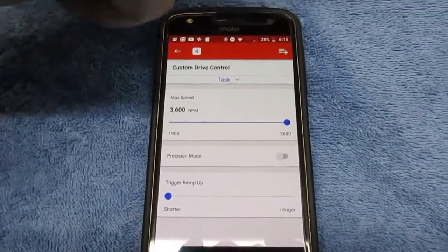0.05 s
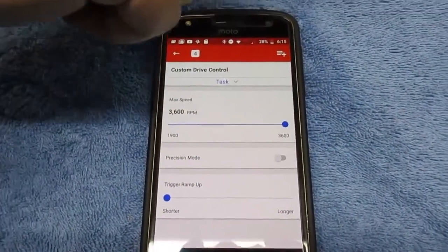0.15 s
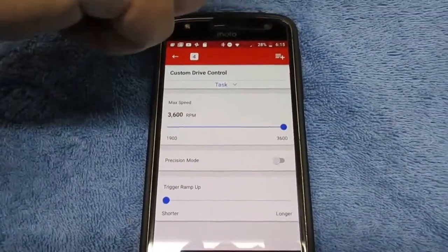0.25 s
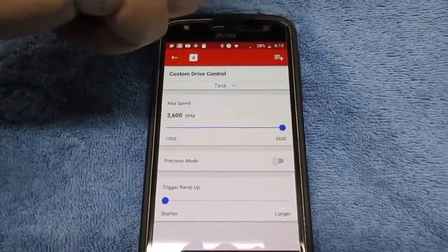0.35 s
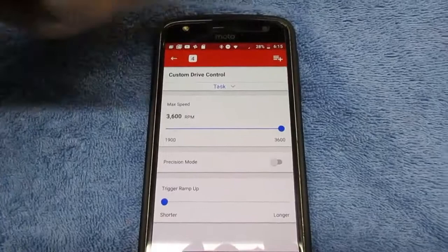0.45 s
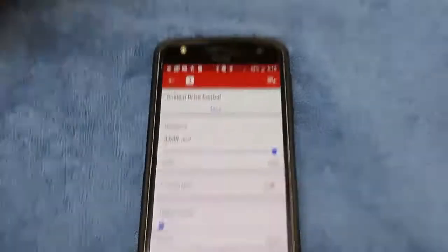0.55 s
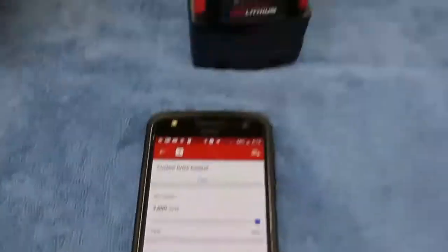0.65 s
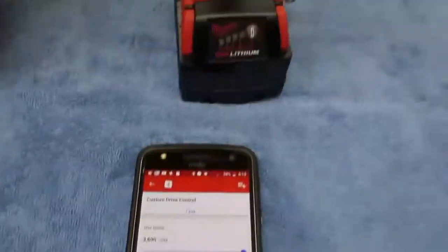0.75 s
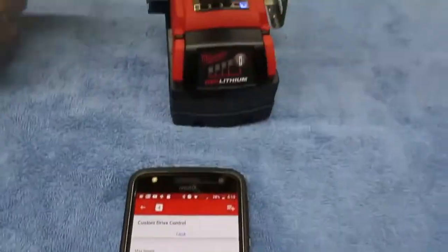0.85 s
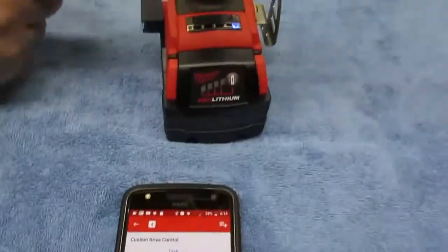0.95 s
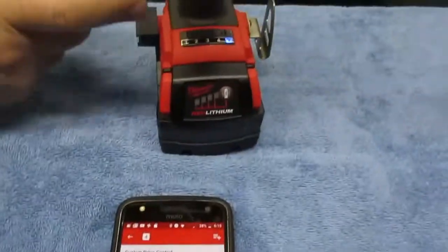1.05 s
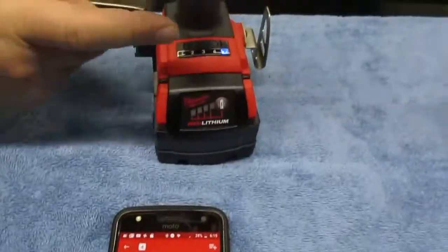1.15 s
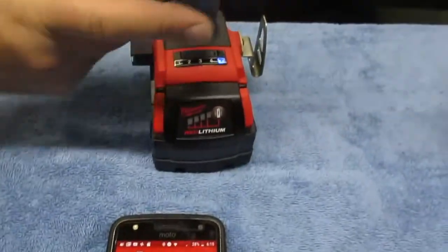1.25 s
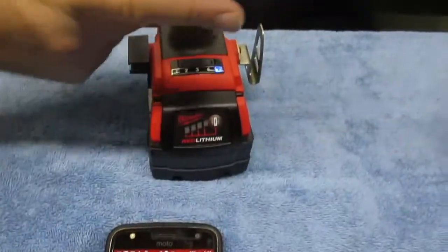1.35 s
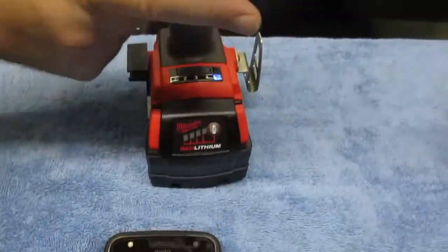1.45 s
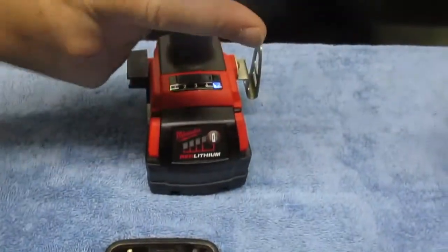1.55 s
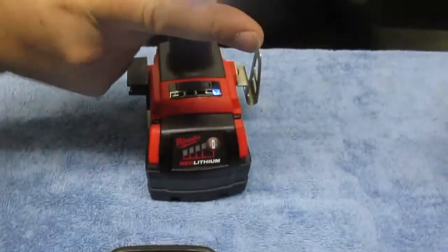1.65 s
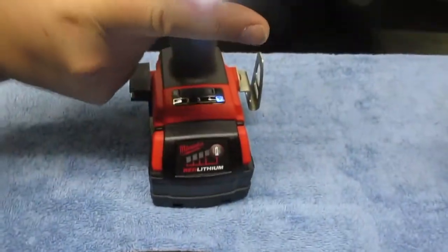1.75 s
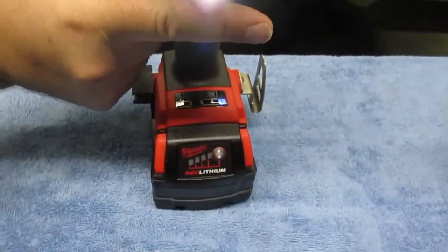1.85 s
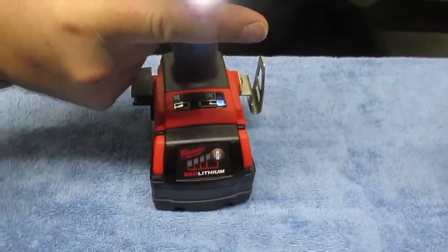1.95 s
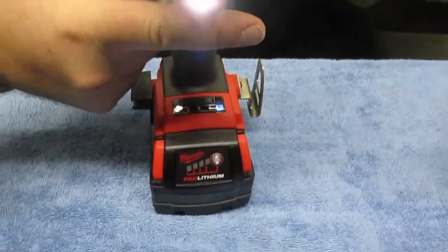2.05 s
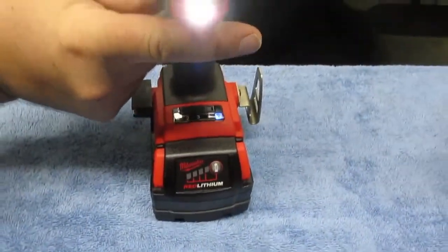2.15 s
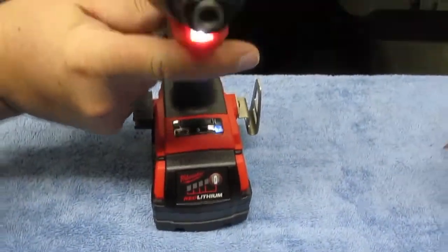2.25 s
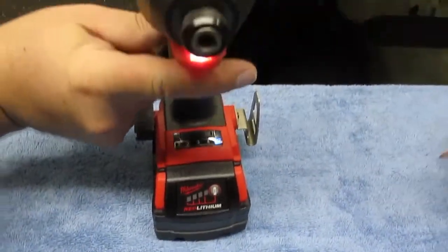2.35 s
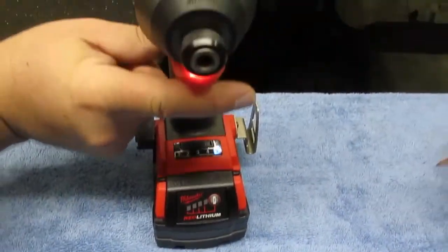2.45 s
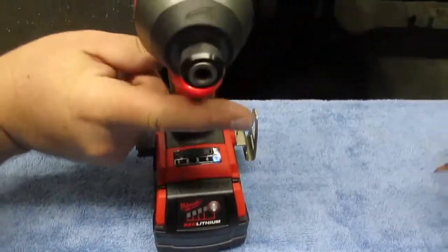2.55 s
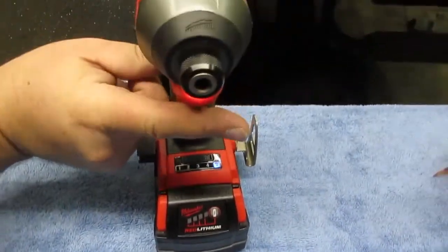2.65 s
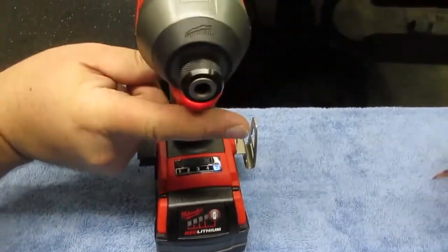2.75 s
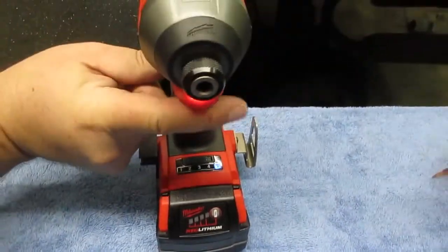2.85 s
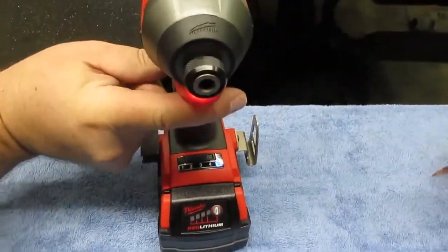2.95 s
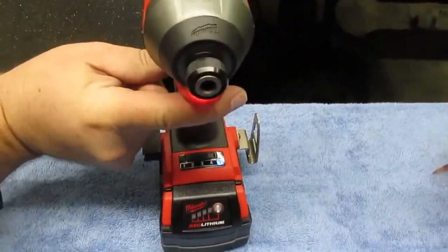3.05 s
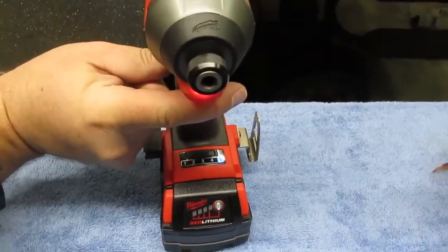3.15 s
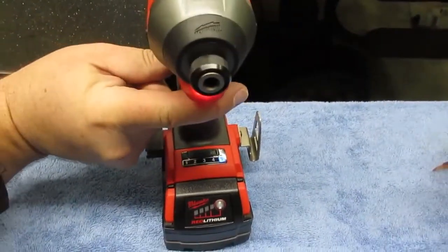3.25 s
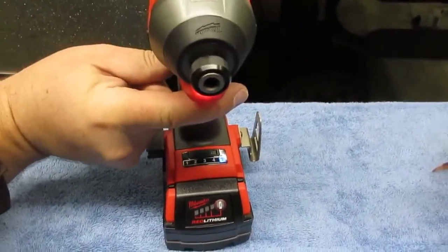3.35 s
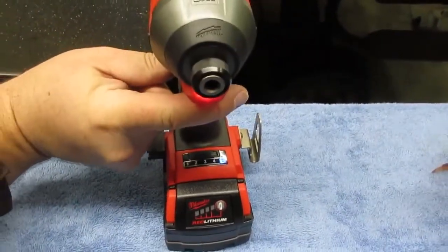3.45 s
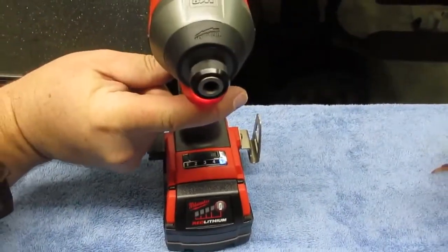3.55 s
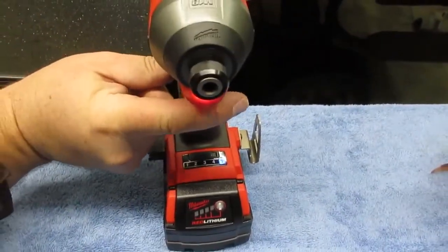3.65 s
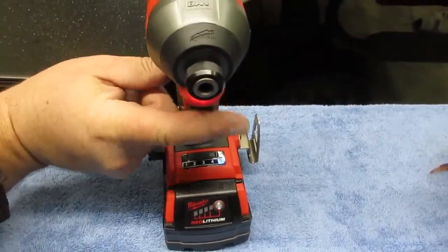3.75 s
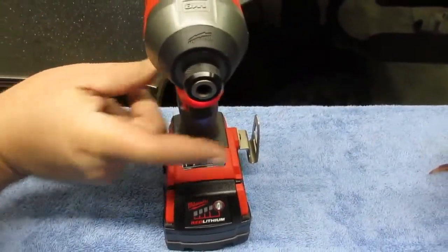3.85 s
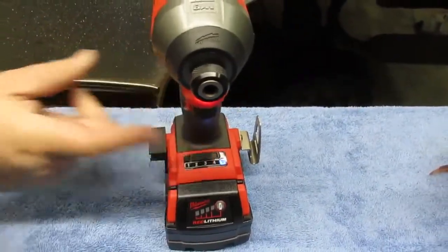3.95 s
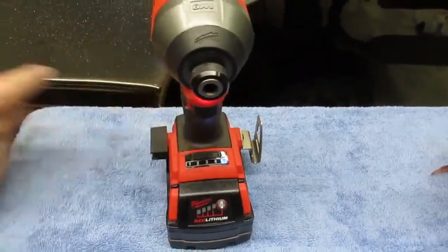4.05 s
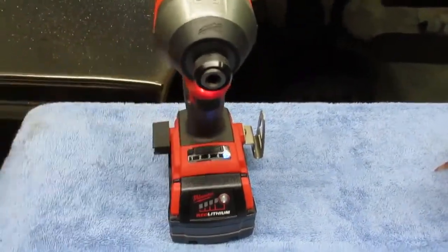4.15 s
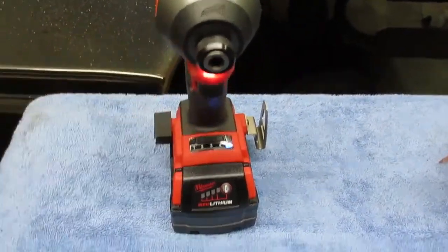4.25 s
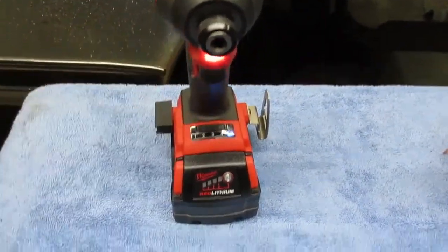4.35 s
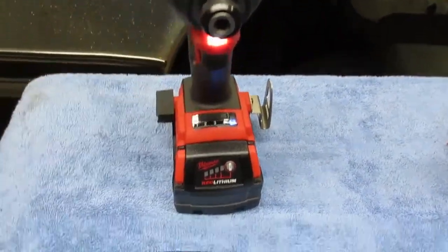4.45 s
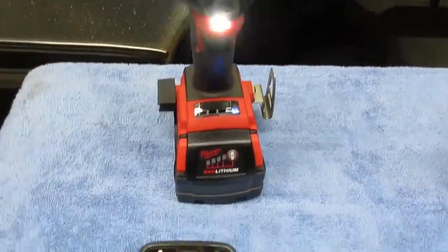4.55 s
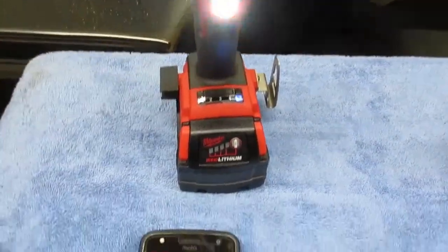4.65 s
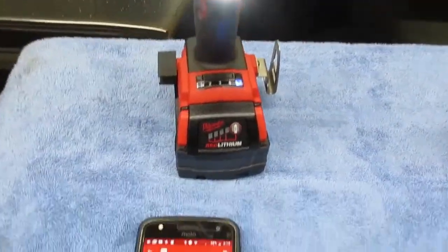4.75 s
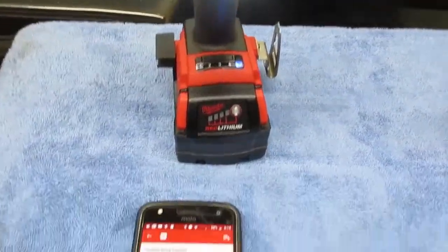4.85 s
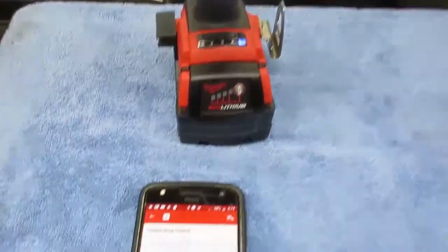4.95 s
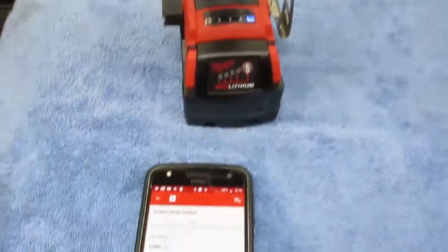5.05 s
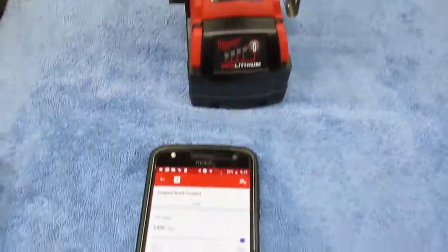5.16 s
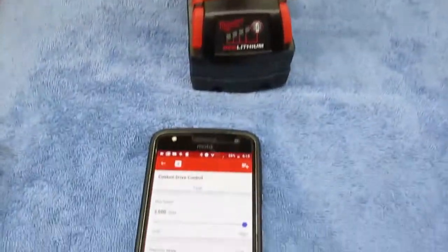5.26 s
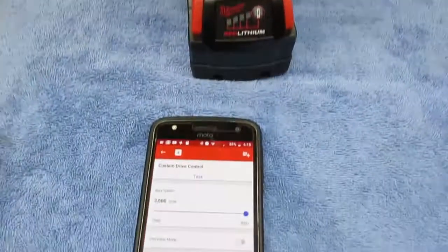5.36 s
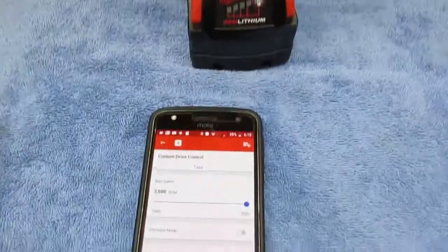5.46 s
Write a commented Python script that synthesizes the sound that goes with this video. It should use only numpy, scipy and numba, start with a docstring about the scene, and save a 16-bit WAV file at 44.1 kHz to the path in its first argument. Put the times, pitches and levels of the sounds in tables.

```python
"""Cordless impact driver on a workbench

An impact driver is run up twice with an empty chuck, close by. The trigger clicks, the motor races to its
governed speed, holds it and is braked. It whines at multiples of its speed; knocking gear teeth excite the
housing, and the gear case flares as the tooth rate sweeps through its ring. A fan hums in the room, and
the camera's gain control ducks everything when the level gets too high, then lets it creep back."""
import sys
import numpy as np
from scipy import signal
from scipy.fft import rfft, irfft, next_fast_len
from scipy.io import wavfile
from scipy.ndimage import uniform_filter1d
from numba import njit

SR = 44100
rng = np.random.default_rng(int(sys.argv[2]) if len(sys.argv) > 2 else 0)


def wrap_up_sound(samples):
    """Save the sound to the file named by the first command line argument, as 16-bit audio."""
    columns = np.atleast_2d(samples).T
    # keep every value between -1 and 1, then stretch to whole-number steps
    tamed = np.clip(columns, -1, 1)
    steps = np.round(tamed * 32767).astype(np.int16)
    wavfile.write(sys.argv[1], SR, steps)


N = 242574
T = np.arange(N) / SR
FFT_SIZE = next_fast_len(N, True)
FREQS = np.maximum(np.arange(FFT_SIZE // 2 + 1) * SR / FFT_SIZE, 1)

# pulls of the trigger, levels relative within the driver mix:
# [start_s, release_s, rattle_db, hiss_db, extra_rattle_under_torque_db, drift_of_both_db_per_s]
TRIGGER_PULLS = [(1.915, 2.604, -18.5, -21.5, 5, .6), (3.066, 3.827, -17.5, -21, 5, -2.5)]
# relative response of the housing to tooth knocks: [frequency_hz, level_db]
HOUSING_RESPONSE = [(150, -31), (450, -24.5), (820, -14.5), (1080, -14), (1400, -11), (1640, 0.0),
                    (1850, -2), (2050, -10.5), (2500, -13), (3350, -8), (4300, -14), (6200, -18),
                    (8600, -16.5), (12500, -27)]

FULL_HZ = 411  # governed motor speed, turns per second
TEETH_PER_TURN = 13  # tooth meetings per motor turn
STOP_S = .156  # length of the run-down


def undb(db):
    """Decibels to gain."""
    return 10 ** (np.asarray(db) / 20)


def unit(x):
    """Scale to rms 1."""
    return x / np.sqrt(np.mean(x ** 2))


def shape(x, gain):
    """Filter with a gain for each frequency."""
    return irfft(rfft(x, FFT_SIZE) * gain, FFT_SIZE)[:N]


def colour(points):
    """Gain for each frequency, drawn through (Hz, dB) points on a log frequency axis."""
    hz, db = np.transpose(points)
    return undb(np.interp(np.log(FREQS), np.log(hz), db))


def resonance(hz, centre_hz, width_hz):
    """Complex response of one mode, 1 at its centre."""
    return 1 / (1 + 1j * (hz ** 2 - centre_hz ** 2) / (hz * width_hz))


def noise(gain):
    """Noise of rms 1 with the given response."""
    return unit(shape(rng.standard_normal(N), gain))


def wander(rate_hz):
    """Smooth random motion of spread 1."""
    return noise(1 / (1 + (FREQS / rate_hz) ** 4))


def motor_speed(ramp_s=.115, ramp_bend=.6, governor_knee=9, friction_share=.24, brake_bend=6):
    """Turns per second: a governed run-up, then friction slows the motor and the brake bites late."""
    speed = np.zeros(N)
    for start, release, *_ in TRIGGER_PULLS:
        # unchecked, the motor would pass full speed after ramp_s; the knee levels it off
        free = (np.maximum(T - start, 0) / ramp_s) ** ramp_bend
        governed = free / (1 + free ** governor_knee) ** (1 / governor_knee)
        stopping = np.clip((T - release) / STOP_S, 0, 1)
        lost = friction_share * stopping + (1 - friction_share) * stopping ** brake_bend
        speed += FULL_HZ * governed * np.maximum(1 - lost, 0)
    return speed


def torque(speed, full_torque_hz_per_s=1700):
    """How hard the teeth press, 0 to 1: only while the motor speeds up."""
    acceleration = np.maximum(np.gradient(speed), 0) * SR
    return np.tanh(acceleration / full_torque_hz_per_s)


def rattle(speed, scatter_db=1.0, repeat=0.71, air=0.93):
    """Gear teeth knock with random force; part of the pattern comes back with each turn of the carrier."""
    tooth = np.floor(np.cumsum(speed) / SR * TEETH_PER_TURN).astype(int)
    meets = np.diff(tooth, prepend=0)
    force = rng.standard_normal(N) * undb(scatter_db * rng.standard_normal(N))
    pattern = rng.standard_normal(N)[tooth % 104]  # repeats every 104 tooth meetings
    knocks = meets * (force + repeat * pattern) * speed / FULL_HZ
    knocks = knocks / np.std(knocks[speed > FULL_HZ / 2])
    # bearings and the cooling fan fill the gaps between the knocks
    return knocks + air * rng.standard_normal(N)


def gears(speed, split_hz=4300, flutter_db=0.82, rattle_flutter_db=1.1):
    """The rattle rings the housing; its hiss dies sooner than its body as the motor slows."""
    # growth of each layer as a power of speed, coasting and under torque
    rattle_power, rattle_torque_power = 0.71, 1.14
    hiss_power, hiss_torque_power, hiss_torque_db = 3, 1.2, 4.3

    drive = shape(rattle(speed), 1 / (1 + (110 / FREQS) ** 4))  # a small tool radiates little bass
    housing = colour(HOUSING_RESPONSE)
    low_share = 1 / (1 + (FREQS / split_hz) ** 8)
    body = shape(drive, housing * low_share)
    hiss = shape(drive, housing * (1 - low_share))
    running = speed > FULL_HZ / 2
    body = body / np.std(body[running]) * undb(rattle_flutter_db * wander(47))
    hiss = hiss / np.std(hiss[running])

    share, push = speed / FULL_HZ, torque(speed)
    coasting_hiss = (1 - push) * share ** hiss_power
    pushed_hiss = push * undb(hiss_torque_db) * share ** hiss_torque_power
    hiss = hiss * (coasting_hiss + pushed_hiss)
    out = np.zeros(N)
    for start, release, rattle_db, hiss_db, torque_db, drift_db in TRIGGER_PULLS:
        coasting_force = (1 - push) * share ** rattle_power
        pushed_force = push * undb(torque_db) * share ** rattle_torque_power
        rattling = undb(rattle_db) * (coasting_force + pushed_force) * body
        active = (T > start) & (T < release + STOP_S)
        out += active * undb(drift_db * (T - start)) * (rattling + undb(hiss_db) * hiss)
    return out * undb(flutter_db * wander(22))


def whine(speed, fade_share=.875, fade_width=.04, torque_lead=0.037, motor_rough=0.17, gear_rough=0.9):
    """Tones follow the motor and emerge only near full speed, a little sooner under torque."""
    # motor tones, relative levels: [multiple_of_speed, upright_db, facing_microphone_db, extra_under_torque_db]
    motor_orders = [(4, -24, -27.5, -7.5), (8, -23, -20.5, 10), (13, -35, -28.5, 8), (26, -36, -43, 0.5),
                    (36, -58, -60, -2)]
    # gear train and chuck tones, relative levels: [pitch_at_full_speed_hz, level_db]
    gear_tones = [(50.2, -50), (150.5, -61.5), (1229, -39.5), (1757, -37.5), (1856, -30), (2578, -42),
                  (2890, -44.5), (3961, -42), (5157, -38)]
    # how far the driver is tipped towards the microphone: [time_s, tilt (0 upright to 1 facing)]
    tilt_points = [(2.22, 0), (2.38, 0.43), (3.15, 1)]

    speed = speed * (1 + 0.0004 * wander(29))
    turns, share = np.cumsum(speed) / SR, speed / FULL_HZ
    tilt, push = np.interp(T, *np.transpose(tilt_points)), torque(speed)

    def tone(multiple, db, rough):
        """One rotating tone whose size and phase flutter."""
        flutter = 1 + rough * (wander(41) + 1j * wander(45))
        return np.sqrt(2) * undb(db) * flutter * np.exp(2j * np.pi * multiple * turns)

    # each order radiates in its own direction, so the mix changes as the tool tips
    motor = 0
    for multiple, upright, facing, pushed in motor_orders:
        level_db = upright + tilt * (facing - upright) + push * pushed
        motor = motor + tone(round(multiple), level_db, motor_rough)
    # backlash shakes the fast tones more than the slow wobble of the chuck
    train = 0
    for hz, db in gear_tones:
        train = train + tone(hz / FULL_HZ, db, gear_rough * min(hz / 1800, 1))
    emergence = .5 + .5 * np.tanh((share - fade_share + torque_lead * push) / fade_width)
    return (emergence * (motor + share ** 4 * train)).real


def case_ring(speed, ring_hz=2980, ring_width_hz=480, driven_db=-11, coasting_db=-16,
              driven_knock_db=-6, coasting_knock_db=-17):
    """The tooth rate sweeps through a gear-case mode, roughly when driven, more cleanly when coasting."""
    driven = np.gradient(speed) > 0
    # the knocks harden with speed until the teeth stay in contact
    hardening = np.clip(speed / 150, 0, 1)
    loose = np.clip((FULL_HZ - 40 - speed) / 130, 0, 1)
    tooth_hz = TEETH_PER_TURN * speed * (1 + 0.0096 * wander(150))
    roughness = 1 + np.where(driven, .7, .2) * wander(120)
    mesh = roughness * np.sin(2 * np.pi * np.cumsum(tooth_hz) / SR)
    tonal = undb(np.where(driven, driven_db, coasting_db)) * mesh
    knocks = undb(np.where(driven, driven_knock_db, coasting_knock_db)) * rng.standard_normal(N)
    return shape(hardening * loose * (tonal + knocks), resonance(FREQS, ring_hz, ring_width_hz) ** 2)


def clicks(tail_db=-25, tail_s=0.0036, body_s=0.0026, q=1.1):
    """Each click is a sharp crack of its own brightness with a short ring of the grip and the housing."""
    # trigger and switch clicks and small handling ticks, levels before the bass cut and halving below:
    # [start_s, crack_db, decay_s, centre_hz, housing_knock_re_crack_db]
    click_events = [(0.1852, -34.5, 0.0022, 4360, -20), (.653, -42, 0.0045, 5800, -20),
                    (1.645, -42, 0.0062, 4400, -20), (1.8606, -14, 0.0014, 5500, -24.5),
                    (1.9128, -1, .0006, 5100, -9), (1.921, 16, .0004, 8300, -33),
                    (2.9894, -30, .001, 6900, -20), (3.01, -17.5, 0.0022, 6030, -18),
                    (3.0636, 0.5, 0.00064, 7000, -5.5), (3.0705, 1, 0.00094, 10000, -26),
                    (4.262, -36, .002, 9000, -22)]
    out, housing = np.zeros(N), noise(colour(HOUSING_RESPONSE))
    age = T[T < .1]
    for start, db, decay, hz, body_db in click_events:
        first = int(start * SR)
        span = slice(first, first + len(age))
        crack = unit(signal.lfilter(*signal.iirpeak(hz, q, fs=SR), rng.standard_normal(len(age))))
        fade = np.exp(-age / decay) + undb(tail_db) * np.exp(-age / tail_s)
        out[span] += undb(db) * crack * fade
        out[span] += undb(db + body_db) * housing[span] * np.exp(-age / body_s)
    bass_cut = signal.butter(2, 350, "highpass", fs=SR, output="sos")  # small parts radiate little bass
    return .5 * signal.sosfilt(bass_cut, out)


def room(x, wet_db=-22, t60=0.26):
    """A weak, short tail from the workshop: decaying noise convolved with the direct sound."""
    tail = noise(resonance(FREQS, 2500, 8000)) * undb(-60 * T / t60) * (T > .004)
    tail = tail / np.sqrt(np.sum(tail ** 2))
    return x + undb(wet_db) * signal.fftconvolve(x, tail)[:N]


def handling():
    """Faint bumps, brushes and whirrs are noise bands that swell and fade."""
    # noises around the bench: [peak_s, swell_s (peak to 1/e), centre_hz, mode_width_hz, peak_level_db]
    bench_noises = [(1.13, 0.68, 3240, 347, -60), (3.044, 0.038, 6500, 9000, -45.5),
                    (4.26, 0.22, 451.5, 25, -40.5), (4.697, 0.026, 80.6, 35.2, -38.5),
                    (4.869, 0.058, 8950, 11000, -53), (5.147, .08, 13500, 1000, -68),
                    (5.474, 0.056, 447, 25, -38)]
    out = np.zeros(N)
    for peak, length, hz, width, db in bench_noises:
        swell = np.exp(-((T - peak) / length) ** 2)
        out += undb(db) * swell * noise(resonance(FREQS, hz, width) ** 2)
    return out


def fan(air_db=-40.0, swell_db=1.28):
    """Slowly swelling broad air noise, droning narrow noise resonances and steady hum tones."""
    # relative colour of the room air: [frequency_hz, level_db]
    air_colour = [(20, -14.5), (35, -11.5), (55, -8.5), (100, -9.5), (170, -0.4), (400, 1), (520, -3.5),
                  (780, -2.5), (1100, -9), (2000, -11.5), (3200, -20), (4500, -25), (8500, -28.5),
                  (14500, -36.5)]
    # fan resonances, width before the doubling below: [centre_hz, width_hz, level_db]
    fan_modes = [(237.7, 15.2, -39.5), (301.6, 16, -45.5), (625, 5.7, -56)]
    # hum tones: [pitch_hz, rms_level_db]
    hum_tones = [(120, -64), (240, -39.5), (379, -61.5)]
    out = undb(air_db + swell_db * wander(3.3)) * noise(colour(air_colour))
    for hz, width, db in fan_modes:
        out += undb(db) * noise(resonance(FREQS, hz, 2 * width) ** 2)
    for hz, db in hum_tones:
        out += np.sqrt(2) * undb(db) * np.sin(2 * np.pi * hz * T)
    return out


def scene(driver_db=10.0):
    """The driver and its clicks in the room, over handling noises and the fan."""
    speed = motor_speed()
    driver = undb(driver_db) * (gears(speed) + whine(speed) + case_ring(speed))
    return (room(driver + clicks()) + handling() + fan())[None]


@njit
def duck(over_db, attack, release):
    """Gain reduction that rises quickly with any excess and sinks at a steady rate."""
    cut, out = 0., np.empty(len(over_db))
    for i in range(len(over_db)):
        if over_db[i] > cut:
            cut += (over_db[i] - cut) * attack
        else:
            cut = max(cut - release, 0.)
        out[i] = cut
    return out


def record(dry, ceiling_db=-12, attack_s=0.0023, recover_db_per_s=3.5, top_hz=15050):
    """The camera's gain control, its full-scale limit and its treble cut-off."""
    power = np.abs(uniform_filter1d(dry[0] ** 2, size=160))
    level_db = 10 * np.log10(power + 1e-12)
    cut_db = duck(level_db - ceiling_db, 1 / (attack_s * SR), recover_db_per_s / SR)
    limited = np.clip(dry * undb(-cut_db), -1, 1)
    return signal.sosfilt(signal.ellip(12, .1, 70, top_hz, fs=SR, output="sos"), limited)


dry = scene()
out = record(dry)
wrap_up_sound(out)
```